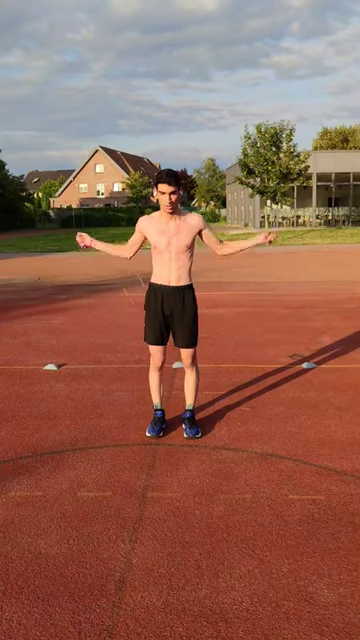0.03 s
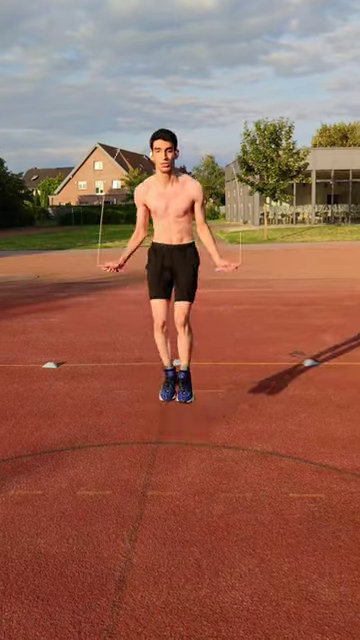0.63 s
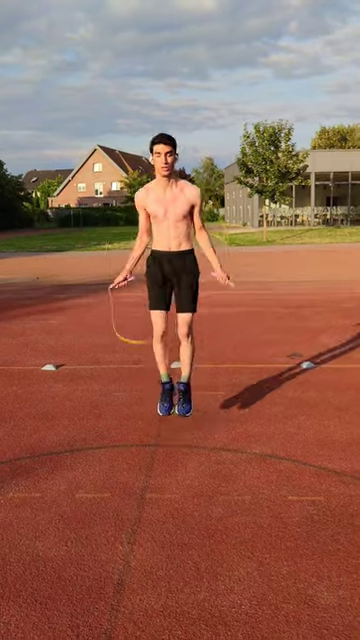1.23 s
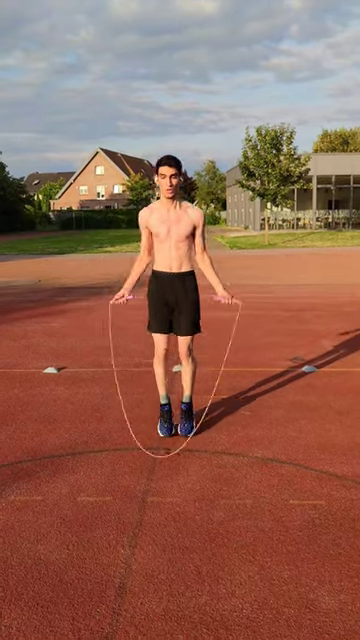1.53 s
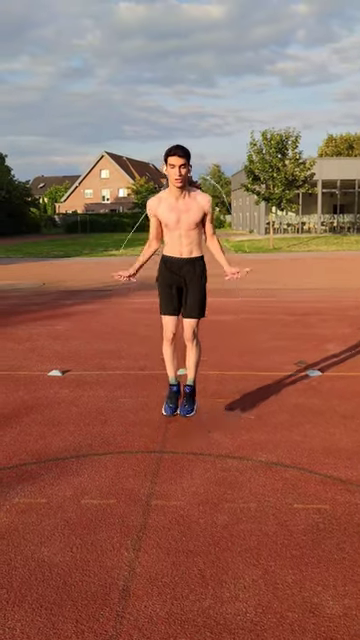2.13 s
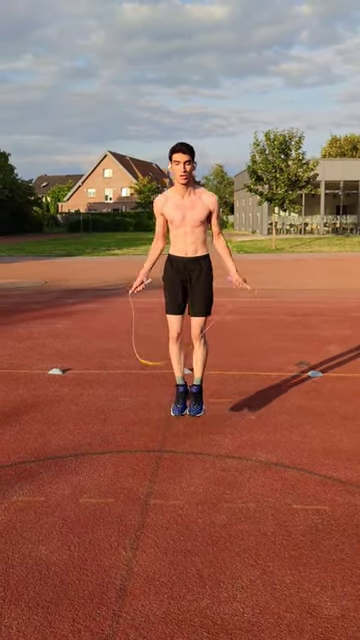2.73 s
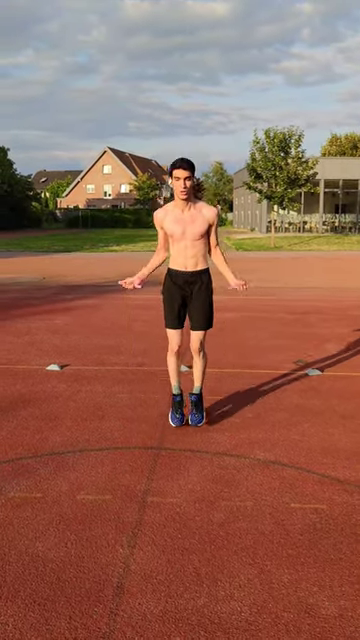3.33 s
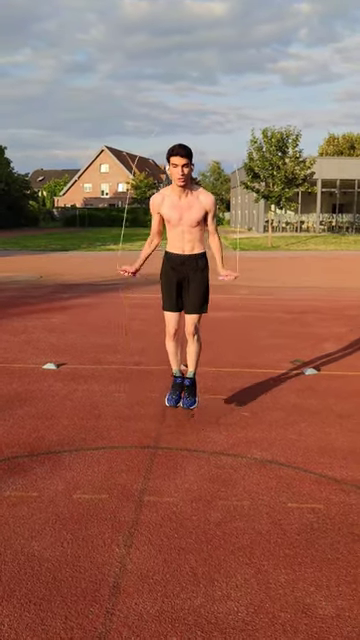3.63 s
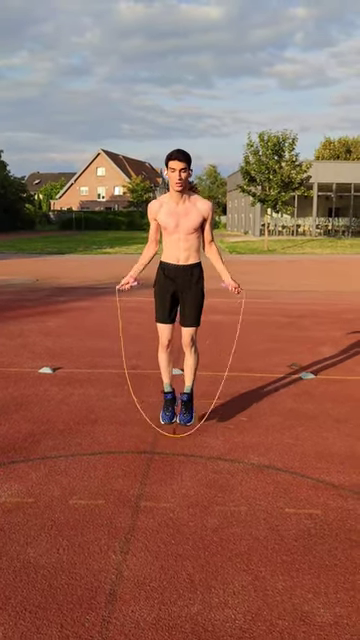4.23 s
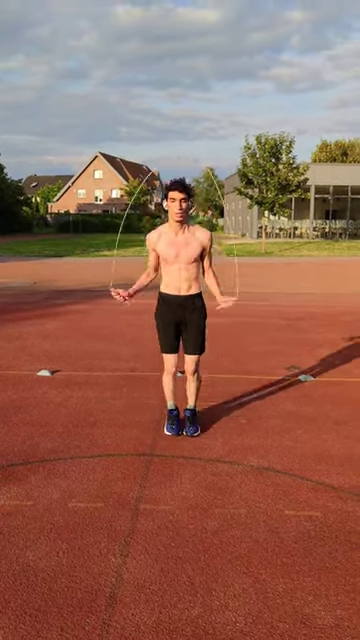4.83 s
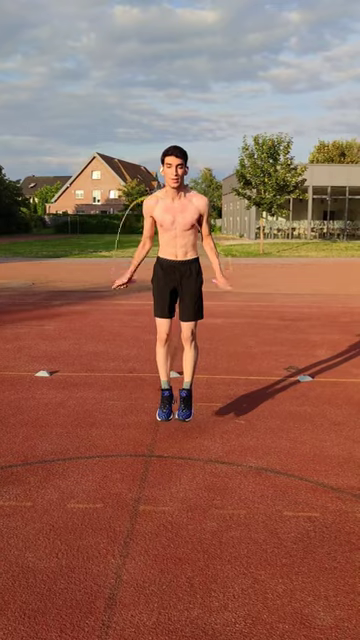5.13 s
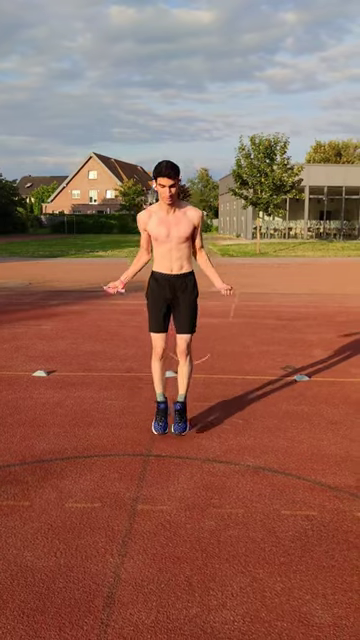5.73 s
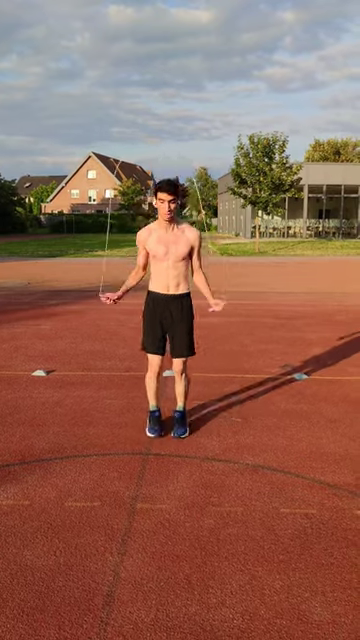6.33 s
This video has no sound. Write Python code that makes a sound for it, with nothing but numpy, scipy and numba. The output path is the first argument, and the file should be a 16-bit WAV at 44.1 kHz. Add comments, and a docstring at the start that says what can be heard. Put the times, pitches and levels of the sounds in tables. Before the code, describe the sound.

Steady rope skipping outdoors: a whistling whoosh, a sharp slap on the court and a light shoe landing, about twice a second.

```python
"""A faint scrape and a rising swish: rope skipping on an outdoor court, about two turns a second.
The rope sheds vortices and sings in four strokes a turn, then slaps the ground; both shoes land
a third of a second later. A hand-held phone listens a few metres off. Two knocks on its case reach
the right microphone port, and a breeze buffets both. Behind: distant rumble, hiss, faint whines."""
import sys
import numpy as np
from scipy import signal
from scipy.fft import rfft, irfft
from scipy.io import wavfile
from scipy.ndimage import uniform_filter1d
from numba import njit

SR = 44100
rng = np.random.default_rng(int(sys.argv[2]) if len(sys.argv) > 2 else 0)


def output_pcm(signal):
    """Save a mono or channel-first signal as 16-bit PCM at the path in sys.argv[1].

    Samples are clipped to [-1, 1] before scaling.
    """
    pcm = np.clip(np.atleast_2d(signal).T, -1, 1) * 32767
    wavfile.write(sys.argv[1], SR, np.round(pcm).astype(np.int16))


N = 290178
TIME = np.arange(N) / SR

# Table levels are relative; each source adds its own gain.
# spectra: f/Hz, level/dB
AIR_SPECTRUM = [(25, -8.5), (80, -2), (160, -9.5), (330, -10.5), (450, -8.5), (680, -16), (2000, -27),
                (4000, -39), (7300, -41), (15000, -39)]
GUST_SPECTRUM = [(20, -11.5), (55, 3), (100, 2), (180, -9.5), (350, -24), (1000, -58), (8000, -99)]
HISS_SPECTRUM = [(300, 0.5), (1500, 5.5), (3000, 0), (4500, -3.5), (6500, -7.5), (9000, -6), (15000, -10.5)]
SOLE_SPECTRUM = [(100, 15.5), (400, 2), (900, 9.5), (1600, -5.5), (4200, -11), (6500, -20.5),
                 (15000, -30.5)]
SCUFF_SPECTRUM = [(100, -18), (220, -8.5), (370, 10.5), (600, -10), (1500, -20), (8000, -64)]
SLAP_SPECTRUM = [(100, -75), (600, -12), (1000, -0.5), (1700, -1), (2600, 6), (3800, -2.5), (5500, -9.5),
                 (15000, -21)]
CRACK_SPECTRUM = [(2000, -0.5), (6000, 5.5), (8500, 7.5), (15000, 7)]
# whines: centre t/s, length/s, centre f/Hz, glide/(Hz/s), level/dB
WHINE_GLIDES = [(0.919, .4, 533.6, 258, -58), (1.526, 0.54, 495.4, -450, -58),
                (1.943, 0.7, 420.5, 3, -58.5), (2.434, 0.46, 489, -270, -55.5),
                (3.253, 0.24, 545, 40, -62.5), (4.387, 0.45, 476, -280, -58),
                (5.35, 0.44, 490.4, -260, -57.5)]
# breeze between gusts: t/s, left level/dB, right level/dB
BREEZE_LEVELS = [(.8, -68, -72), (1.2, -64, -52), (2.101, -67, -53), (2.502, -51.5, -60.5), (3.1, -49, -51),
                 (3.45, -48.5, -60), (4.1, -49, -57), (4.399, -79, -64)]
# gusts: t/s, level/dB, port (0 left, 1 right)
PORT_GUSTS = [(2.05, -35.5, 1), (2.633, -33.5, 0), (3.076, -28, 0), (3.2, -36, 0), (3.44, -37, 0),
              (3.496, -29.5, 0), (3.92, -21.5, 0), (4.17, -37, 0)]
# knocks on the phone: t/s, level/dB, edge re knock/dB, rub level/dB
CASE_KNOCKS = [(0.648, -3, 8, -38), (1.1245, -11, -6, -46)]
# phone case modes: f/Hz, decay/s, level/dB
CASE_MODES = [(121, 0.0069, -16), (473, 0.00053, 7), (1260, 0.00011, 9.5)]
# landings: t/s, level/dB, thud f/Hz, second shoe lag/s, click re landing/dB
SHOE_LANDINGS = [(1.0159, -35.5, 258, 0.0073, 9.5), (1.5425, -32, 264, 0.0098, 8),
                 (2.0266, -34.5, 320, 0.0019, 6.5), (2.535, -36, 276, 0.0029, 9),
                 (3.0415, -35, 277, 0.005, 10.5), (3.5249, -34, 241, 0.0083, 8.5),
                 (3.9974, -34, 258.5, 0.0074, 8), (4.477, -34.5, 206, 0.0035, 7.5),
                 (4.9508, -33, 228, 0.007, 9), (5.4470, -32.5, 228, 0.0036, 3),
                 (5.9367, -33, 247.6, 0.0049, 5), (6.424, -34.5, 221, 0.0039, 6)]
# rope hits the court, once a turn: t/s, level/dB, ring f/Hz, crack re slap/dB
ROPE_SLAPS = [(0.6537, -23, 2630, -8.5), (1.2111, -21, 2670, -19), (1.718, -25.5, 2580, -6),
              (2.212, -24, 2636, -18), (2.7052, -25.5, 2693, -12), (3.203, -27.5, 2575, -7),
              (3.6824, -21.5, 2413, -7.5), (4.1603, -21.5, 2470, -9), (4.6479, -23, 2390, -9),
              (5.1339, -27.5, 2550, -11.5), (5.6299, -25, 2310, -14), (6.1144, -24.5, 2247, -21)]
# light rebounds and flicks: t/s, level/dB
ROPE_FLICKS = [(1.4653, -45), (1.7283, -35), (1.7347, -43), (1.864, -50), (2.222, -38), (4.6626, -42),
               (4.8968, -33)]
# one turn, slap to slap: phase/turns, base f/Hz, wrist whip (0-1), tone level/dB, hiss level/dB
TURN_STROKES = [(0, 1090, 0.1, -43.5, -53), (.04, 1040, 0, -45.5, -62.5), (.1, 1240, .05, -37, -58.5),
                (.17, 1290, 0, -43, -64), (.26, 1140, 0, -47, -61), (.32, 1210, 0.27, -43.5, -55.5),
                (.365, 1260, 0.7, -34, -50.5), (0.418, 1250, 0.3, -37.5, -55.5),
                (0.489, 1170, 0, -37, -58.5), (.54, 1020, 0, -45, -63), (0.618, 1130, 0.14, -39.5, -65.5),
                (0.708, 1210, 0, -45.5, -62), (.79, 1090, 0.1, -47, -59.5), (.85, 1132, 0.2, -39.5, -57.5),
                (.89, 1250, .9, -36, -51.5), (0.949, 1253, 0, -37, -57)]
# wrist drive: t/s, pitch ratio, rise at full whip/Hz, level/dB, stroke lag behind slaps/s
WRIST_EFFORT = [(0.302, 0.65, 0, -52, 0.0062), (.53, 0.7, -5, -25, 0), (0.602, 0.8, 0, -8.5, 0.0046),
                (.9, 0.96, 84, -8, 0.023), (1.399, 0.965, 69, -2.5, 0.0094),
                (1.901, 0.96, 60, -1.5, 0.0028), (2.3, 1.013, 115, 0, -0.0064),
                (2.95, 0.966, 140, -1, 0.0041), (3.5, 0.99, 325, 0, 0.00033),
                (4.701, 0.99, 256, -0.5, 0.00056), (6.55, 1.003, 180, -1.5, -0.0021)]
# rope stretches, hands to middle: pitch ratio, extra whip exponent, delay/s, level/dB
ROPE_STRETCHES = [(0.958, 0.04, 0.0041, -4.5), (0.998, 0.1, -0.00185, -7.5), (1.05, 0.63, -0.004, -9.5)]
# microphone port responses: f/Hz, left level/dB, right level/dB
PORT_SPECTRA = [(700, -3, -3.5), (1146, 1.5, 2), (2160, -2, 1), (4860, 2, 3.5), (6530, 0.5, 6),
                (7150, 2.5, -8.5), (8130, 12.5, -17.5), (9870, 5.5, 0), (11700, 1.5, -8), (13700, 3, 3.5),
                (16000, -4.5, -6), (16100, -34, -13.5)]


def undb(db):
    return 10 ** (np.asarray(db) / 20)


def unit(x):
    return x / np.sqrt(np.mean(x ** 2))


def noise():
    return rng.standard_normal(N)


def walk(rate_hz):
    """Random steps, smoothed twice; RMS 1."""
    hold = max(int(SR / rate_hz), 1)
    steps = np.repeat(rng.standard_normal(N // hold + 1), hold)
    return unit(uniform_filter1d(uniform_filter1d(steps, hold), hold)[:N])


def response(spectrum):
    """Minimum-phase impulse response, by folded cepstrum."""
    hz, db = np.transpose(spectrum)
    size = 4096
    grid_hz = np.maximum(np.arange(size // 2 + 1) * SR / size, 1)
    cepstrum = irfft(np.log(undb(np.interp(np.log(grid_hz), np.log(hz), db))))
    cepstrum[1:size // 2] *= 2
    cepstrum[size // 2 + 1:] = 0
    return irfft(np.exp(rfft(cepstrum)))


def colour(x, spectrum):
    """Filter to a spectrum; white noise keeps its power."""
    h = response(spectrum)
    return signal.fftconvolve(x, h / np.linalg.norm(h))[:len(x)]


def add(track, at_s, sound):
    i = int(at_s * SR)
    track[..., i:i + sound.shape[-1]] += sound[..., :N - i]


def pair(source, alike):
    """Two channels of a random source; alike is their shared part of the power."""
    shared = source()
    return np.array([np.sqrt(alike) * shared + np.sqrt(1 - alike) * source() for _ in range(2)])


@njit
def bandpass(x, hz, width_hz):
    """State-variable filter with moving centre and width."""
    y, band_state, low_state = np.empty(len(x)), 0., 0.
    for i in range(len(x)):
        gain, damping = np.tan(np.pi * hz[i] / SR), width_hz[i] / hz[i]
        band = (band_state + gain * (x[i] - low_state)) / (1 + gain * (gain + damping))
        band_state = 2 * band - band_state
        low_state += 2 * gain * band
        y[i] = damping * band
    return y


def whistle(hz, width_hz):
    """Steep noise band of steady power that follows a pitch."""
    band = bandpass(bandpass(noise(), hz, width_hz), hz, width_hz)
    return unit(band / np.sqrt(width_hz))


def distant_air():
    """Far rumble and hiss, wavering a little."""
    air = pair(lambda: colour(noise(), AIR_SPECTRUM), alike=0.76)
    return undb(-55) * air * undb(walk(rate_hz=7.2))


def whines():
    """Faint narrow bands, each swelling and fading on a straight glide."""
    out = np.zeros(N)
    for centre_s, length_s, centre_hz, glide_hz_per_s, db in WHINE_GLIDES:
        t = np.clip(TIME - centre_s, -length_s / 2, length_s / 2)
        hz = centre_hz + glide_hz_per_s * t
        out += undb(db) * np.cos(np.pi * t / length_s) * whistle(hz, 0.041 * hz)
    return out


def scatter(x, t60_s, wet_db):
    """Thin, dull reflections from open ground, hedges and houses."""
    t = np.arange(SR // 2) / SR
    decay = np.exp(-np.log(1000) * t / t60_s)
    tails = [colour(rng.standard_normal(len(t)), HISS_SPECTRUM) * decay for _ in x]
    wet = [signal.fftconvolve(side, tail / np.linalg.norm(tail))[:N] for side, tail in zip(x, tails)]
    return undb(wet_db) * np.array(wet)


def breeze(eddy_rate_hz=16, eddy_db=2.5, gust_half_width_s=0.02):
    """Low turbulence on each port; a gust is a short swell on one."""
    times_s, *ports_db = np.transpose(BREEZE_LEVELS)
    level_db = [np.interp(TIME, times_s, db) + eddy_db * walk(eddy_rate_hz) for db in ports_db]
    power = undb(level_db) ** 2
    for at_s, db, port in PORT_GUSTS:
        power[port] += undb(db) ** 2 / (1 + ((TIME - at_s) / gust_half_width_s) ** 2) ** 2
    return np.sqrt(power) * pair(lambda: colour(noise(), GUST_SPECTRUM), alike=0)


def knocks(edge_hz=5200, edge_decay_s=0.00013, case_lag_s=0.0002, rub_decay_s=0.04):
    """A sharp tick and a jolt of the case by the right port; a soft rub trails."""
    out, t = np.zeros((2, N)), np.arange(SR // 6) / SR
    case_t = np.maximum(t - case_lag_s, 0)
    case = sum(undb(db) * np.sin(2 * np.pi * hz * case_t) * np.exp(-case_t / decay_s)
               for hz, decay_s, db in CASE_MODES)
    # the port passes no steady pressure, so the jolt swings back
    case = signal.lfilter(*signal.butter(1, 110, "high", fs=SR), case)
    edge = -np.sin(2 * np.pi * edge_hz * t) * np.exp(-t / edge_decay_s)
    for at_s, db, edge_db, rub_db in CASE_KNOCKS:
        rub = colour(rng.standard_normal(len(t)), HISS_SPECTRUM) * np.exp(-t / rub_decay_s)
        add(out[1], at_s, undb(db) * (undb(3) * case + undb(edge_db) * edge) + undb(rub_db) * rub)
    return out


def scrape(centre_s=0.425, half_width_s=0.07):
    """The cord drags over grit as the first swing begins."""
    grit = pair(lambda: unit(colour(noise() * undb(5.8 * walk(rate_hz=149)), SLAP_SPECTRUM)), alike=0.27)
    return undb(-65.5) * grit * np.exp(-((TIME - centre_s) / half_width_s) ** 2)


def contact(t, drag_s, grit_db):
    """One blow, then tiny ones as more length meets the ground; energy 1."""
    force = undb(grit_db) * rng.standard_normal(len(t)) * np.exp(-(t / drag_s) ** 2)
    force[0] += 1
    return force / np.linalg.norm(force)


def shoes(thud_decay_s=0.0048, scuff_decay_s=0.0073,
          settle_lag_s=0.028, settle_hz=170, settle_decay_s=0.007):
    """Two soles land in turn with thud, rubber click and scuff; then the body's weight settles."""
    out, t = np.zeros(N), np.arange(SR // 10) / SR
    settle = np.sin(2 * np.pi * settle_hz * t) * np.exp(-t / settle_decay_s)
    for at_s, db, thud_hz, lag_s, click_db in SHOE_LANDINGS:
        for start_s, foot_db in ((at_s, 0), (at_s + lag_s, -1.5)):
            thud = -np.sin(2 * np.pi * thud_hz * t) * np.exp(-t / thud_decay_s)
            click = colour(contact(t, drag_s=0.0016, grit_db=-7), SOLE_SPECTRUM)
            scuff = colour(rng.standard_normal(len(t)), SCUFF_SPECTRUM) * np.exp(-t / scuff_decay_s)
            sole = undb(4) * thud - undb(click_db + 12.5) * click + undb(-1.5) * scuff
            add(out, start_s, undb(db + foot_db) * sole)
        add(out, at_s + settle_lag_s, undb(db - 8.5) * settle)
    # a sole is too small to radiate deep bass
    return signal.lfilter(*signal.butter(2, 140, "high", fs=SR), out)


def rope_on_court(ring_decay_s=0.0012, slap_lag_s=0.000866):
    """Each slap cracks and briefly rings the cord; flicks are lighter and shorter."""
    out, t = np.zeros((2, N)), np.arange(SR // 20) / SR
    for port in out:
        for at_s, db, ring_hz, crack_db in ROPE_SLAPS:
            force = contact(t, drag_s=0.005, grit_db=-18)
            ring = np.sin(2 * np.pi * ring_hz * t) * np.exp(-t / ring_decay_s)
            cord = signal.fftconvolve(force, ring)[:len(t)]
            slap = colour(force, SLAP_SPECTRUM) + undb(1) * cord / np.linalg.norm(cord)
            crack = undb(crack_db + 1.5) * colour(force, CRACK_SPECTRUM)
            add(port, at_s + slap_lag_s, undb(db + 16) * (slap + crack))
        for at_s, db in ROPE_FLICKS:
            force = contact(t, drag_s=0.0024, grit_db=-21)
            flick = colour(force, SLAP_SPECTRUM) + undb(-17) * colour(force, CRACK_SPECTRUM)
            add(port, at_s, undb(db + 20.5) * flick)
    return out


def swing(first_turn_s=0.57, last_turn_s=0.45):
    """A light and a hard stroke each half turn, scaled by effort: pitch/Hz, tone/dB, hiss/dB."""
    times_s, *effort = np.transpose(WRIST_EFFORT)
    ratio, whip_hz, effort_db, lag_s = (np.interp(TIME, times_s, column) for column in effort)
    slaps_s = [row[0] for row in ROPE_SLAPS]
    bounds_s = [slaps_s[0] - first_turn_s, *slaps_s, slaps_s[-1] + last_turn_s]
    turns = np.interp(TIME - lag_s, bounds_s, np.arange(len(bounds_s)))
    phase, *strokes = np.transpose(TURN_STROKES)
    base_hz, whip, tone_db, hiss_db = (np.interp(turns, phase, column, period=1) for column in strokes)
    return ratio * base_hz + whip * whip_hz, tone_db + effort_db, hiss_db + effort_db


def rope_in_air(reference_hz=1200):
    """Each stretch sheds vortices at a pitch that follows its speed; drag adds the octave."""
    pitch_hz, tone_db, hiss_db = swing()
    tone = octave = 0
    for ratio, whip, delay_s, db in ROPE_STRETCHES:
        delayed_hz = np.interp(TIME - delay_s, TIME, pitch_hz)
        jitter = 1 + 0.025 * walk(rate_hz=30)
        hz = ratio * delayed_hz * (delayed_hz / reference_hz) ** whip * jitter
        width_hz = 130 * (hz / reference_hz) ** 1.5
        lift = pair(lambda: whistle(hz, width_hz), alike=0.4)
        drag = pair(lambda: whistle(2 * hz, 1.5 * width_hz), alike=0.2)
        flutter = undb(3.5 * walk(rate_hz=60))  # shedding locks in and breaks up
        tone += undb(db) * flutter * lift
        octave += undb(db) * flutter * drag
    flanks = pair(lambda: whistle(pitch_hz, 0.55 * pitch_hz), alike=0.047)
    hiss = pair(lambda: colour(noise(), HISS_SPECTRUM), alike=0.26)
    # only fast strokes tear the air enough to rasp
    rasp = pair(lambda: whistle(2.5 * pitch_hz, 1.2 * pitch_hz), alike=0.1) * (pitch_hz / 1400) ** 6
    song = undb(-2) * tone + undb(-11) * flanks + undb(-23.5) * rasp
    turbulence = hiss + undb(-1) * octave
    return song * undb(tone_db) + turbulence * undb(hiss_db)


def scene():
    """Skipper on the open court; wind and knocks at the phone."""
    skipping = rope_in_air() + rope_on_court() + shoes() + scrape()
    skipping[0] = np.roll(skipping[0], 4)  # reaches the left port 4 samples later
    reflections = scatter(skipping, t60_s=0.16, wet_db=-24.5)
    return skipping + reflections + distant_air() + whines() + breeze() + knocks()


def record(dry, fade_start_s=0.11, fade_length_s=0.19, ceiling=0.72, top_hz=16400):
    """Port colour, fade-in, soft clip, low-pass."""
    spectra = np.array(PORT_SPECTRA)
    responses = [response(spectra[:, [0, column]]) for column in (1, 2)]
    heard = np.array([signal.fftconvolve(side, h)[:N] for side, h in zip(dry, responses)])
    fade = np.clip((TIME - fade_start_s) / fade_length_s, 0, 1) ** 2
    rounded = ceiling * np.tanh(heard * fade / ceiling)
    return signal.sosfilt(signal.ellip(10, 0.2, 90, top_hz, fs=SR, output="sos"), rounded)


dry = scene()
out = record(dry)
output_pcm(out)
```